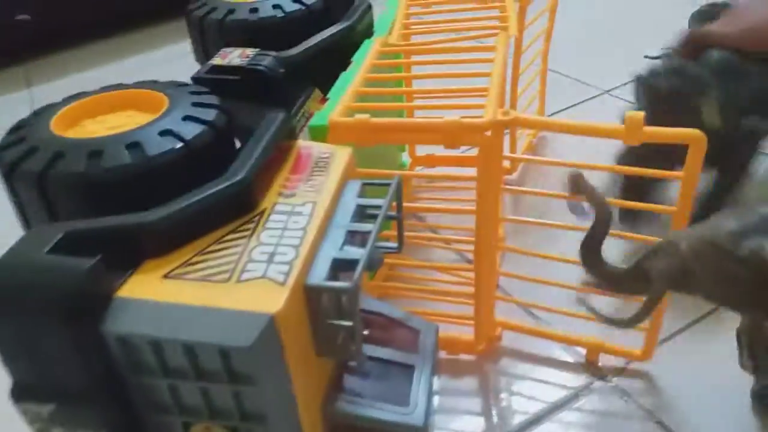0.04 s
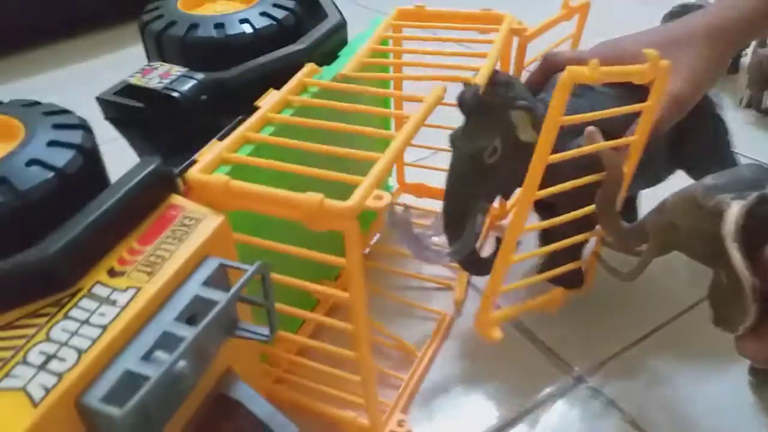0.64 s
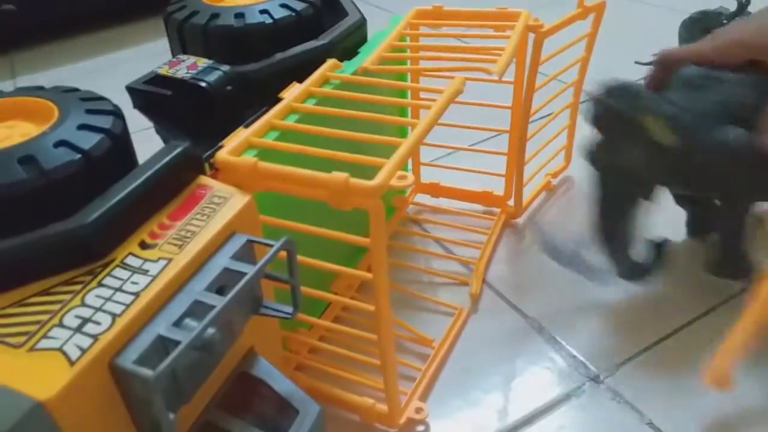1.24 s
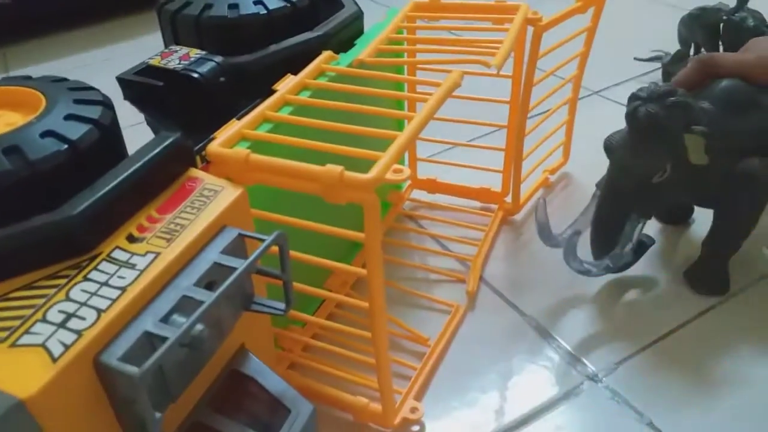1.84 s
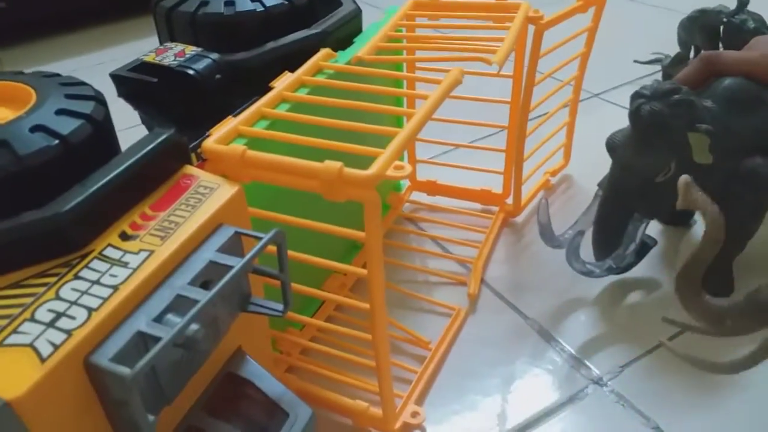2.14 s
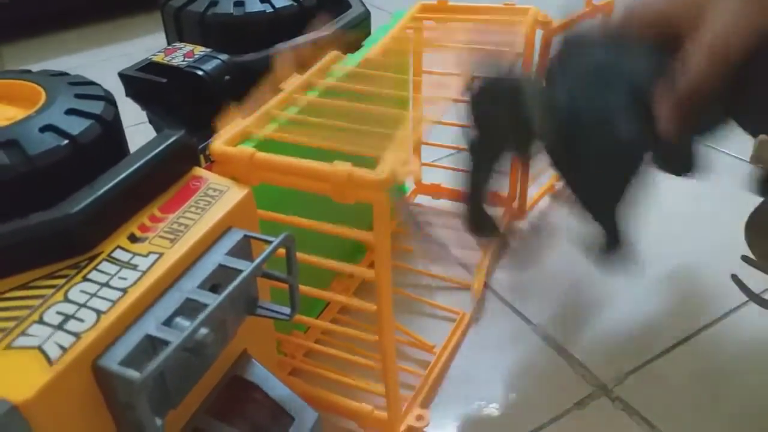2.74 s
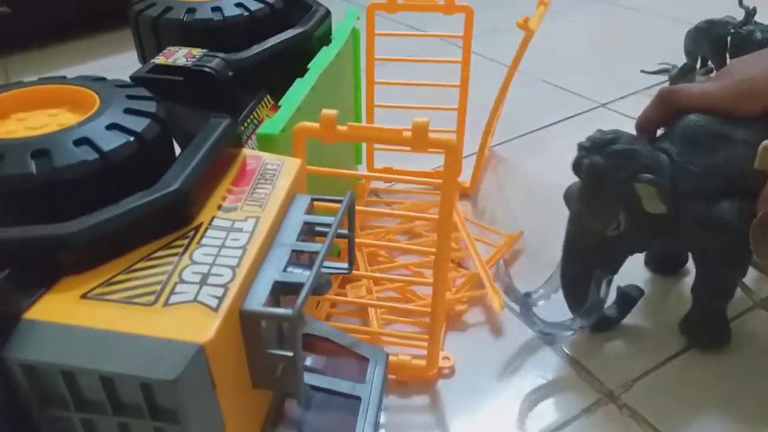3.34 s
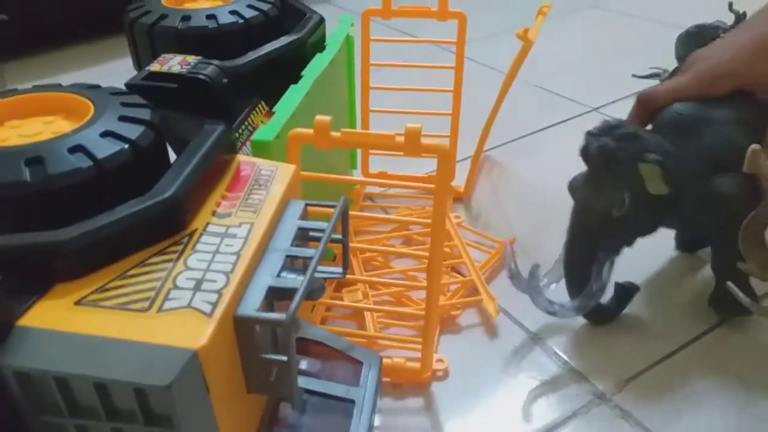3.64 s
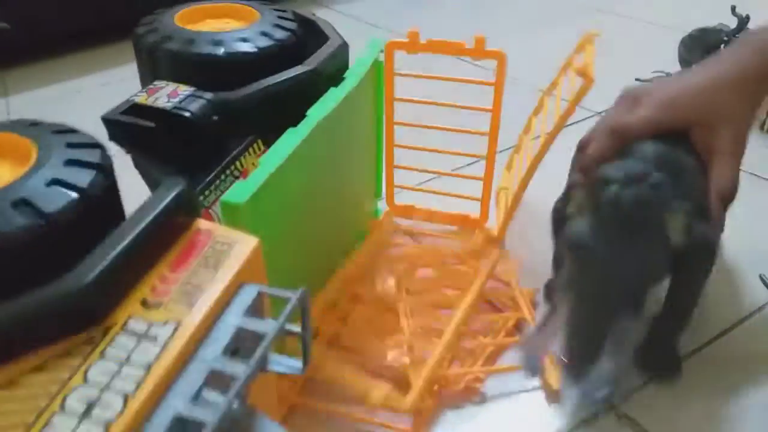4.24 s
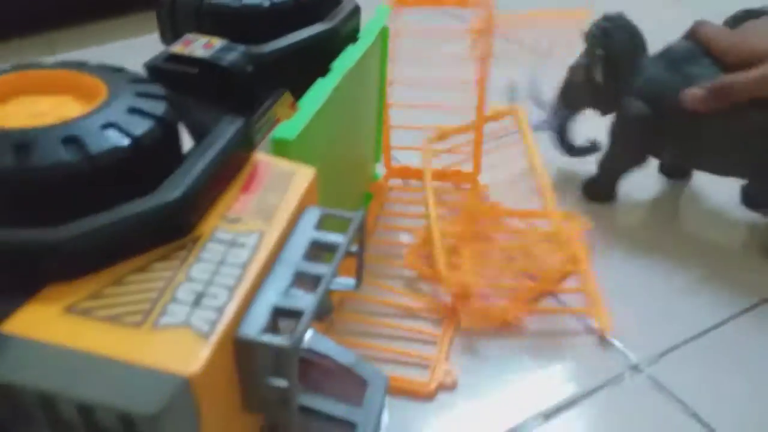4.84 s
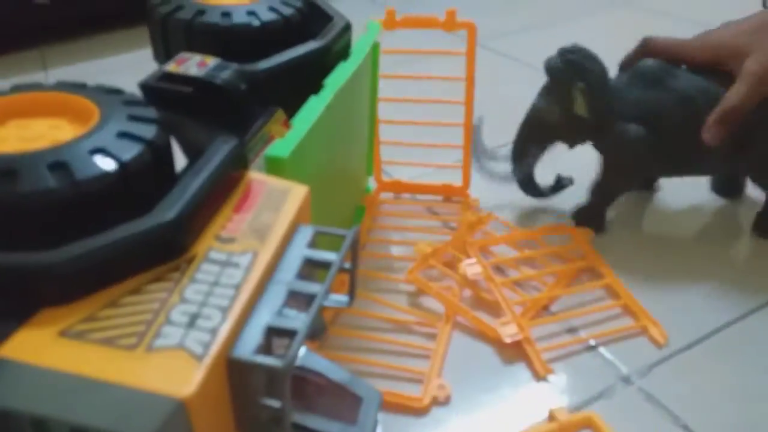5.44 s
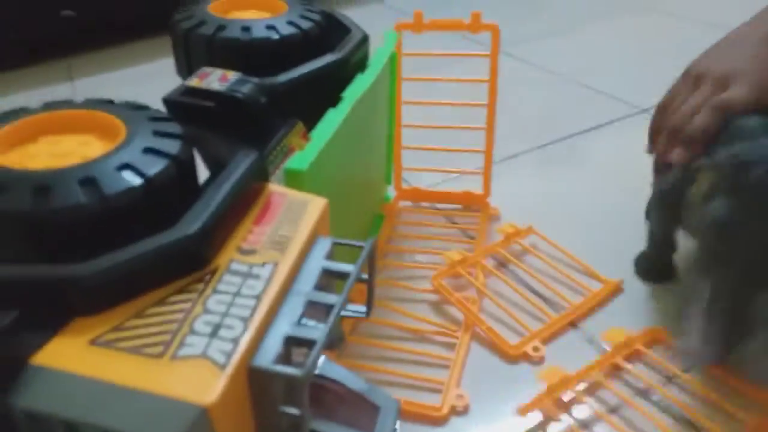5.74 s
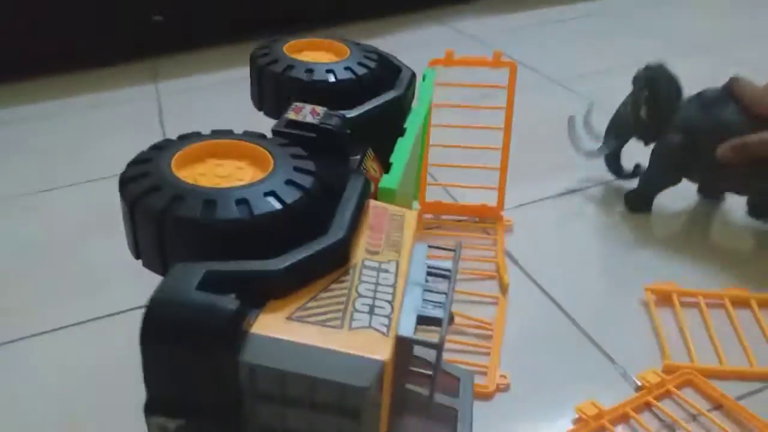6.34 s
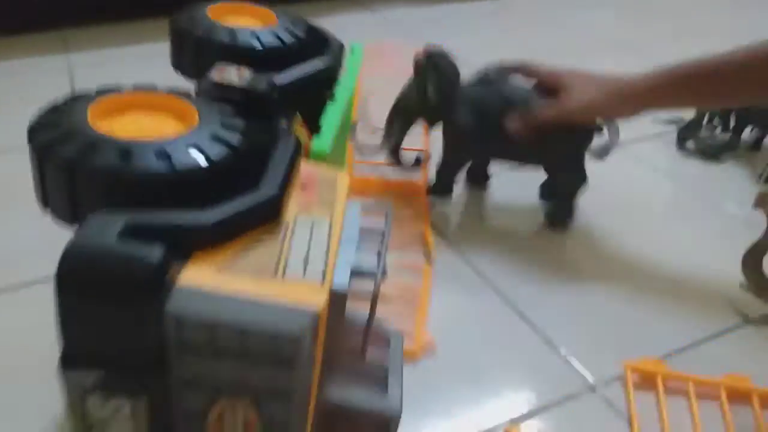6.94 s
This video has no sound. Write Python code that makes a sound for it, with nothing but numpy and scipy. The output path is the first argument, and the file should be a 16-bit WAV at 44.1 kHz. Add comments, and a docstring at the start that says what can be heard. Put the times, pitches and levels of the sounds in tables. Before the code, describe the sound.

A toy elephant is butted against a plastic truck and its cage, making a burst of hollow knocks and rattles. Soft taps, scuffs and dry clicks follow on the floor tiles. More bumps shake the truck, and light fence panels clack down brightly and chatter to rest several times. The toys sound close, in a small, hard room with a short ring and a faint dull hush.

```python
"""Hollow plastic knocks and rattles, bright clacks, and soft taps and scuffs in a small, hard room.
A toy elephant is walked over floor tiles and butted against a plastic truck and its cage of fence panels.
The truck's shell knocks and its loose parts shake; the light panels clack down and chatter to rest;
the figure's feet tap and drag. Each hit is a click and a dying buzz, coloured by the toy's resonances.
The room rings behind them, over a dull hush and a low drone."""
import sys
import numpy as np
from scipy import signal
from scipy.fft import rfft, irfft
from scipy.io import wavfile

SR = 44100
rng = np.random.default_rng(int(sys.argv[2]) if len(sys.argv) > 2 else 0)


def master(y):
    """Save y as 16-bit WAV."""
    cut = np.clip(np.atleast_2d(y).T, -1, 1)
    pcm = np.round(cut * 32767)  # scale
    wavfile.write(sys.argv[1], SR, pcm.astype(np.int16))


N = 312228
HIT_SAMPLES = 8192

# dull tone of the toy figure: (frequency [Hz], gain [dB])
FIGURE_TONE = [(60, -39), (150, 1.5), (350, -0.5), (1000, 0), (1700, -3), (2800, -8), (4000, -14),
               (8000, -32), (15500, -35)]
# tone of plastic rubbing on tile: (frequency [Hz], gain [dB])
SCUFF_TONE = [(100, -24), (250, -5), (700, 0.5), (1300, -6.5), (2400, -3), (4000, -0.5), (7500, -5),
              (9200, -9), (15500, 9)]


def from_db(db):
    """Turn decibels into a gain."""
    return 10 ** (np.asarray(db) / 20)


def rms_one(x):
    """Scale a signal to an average (rms) level of 1."""
    return x / np.sqrt(np.mean(x ** 2) + 1e-20)


def bins(size):
    """Frequencies in the spectrum of a signal this long."""
    return np.maximum(np.fft.rfftfreq(size, 1 / SR), 1)


def at_hz(points, hz):
    """Read a table along a log-frequency axis."""
    known_hz, value = np.transpose(points)
    return np.interp(np.log(hz), np.log(known_hz), value)


def peak(hz, centre, width, db):
    """Boost in dB from one resonance, a pitch at which an object likes to ring."""
    return db / (1 + (2 * (hz - centre) / width) ** 2)


def colour(tone, resonances, size):
    """An object's gain at each frequency: a broad curve with resonances standing out of it."""
    hz = bins(size)
    return from_db(at_hz(tone, hz) + sum(peak(hz, *resonance) for resonance in resonances))


def bands(hz):
    """Share each frequency softly among a low, a middle and a high band."""
    # where the bands meet: (low to middle [Hz], middle to high [Hz])
    edges = [2800, 8700]
    low, below_high = [1 / (1 + (hz / edge) ** 12) for edge in edges]
    return np.array([low, below_high - low, 1 - below_high]).clip(0)


def tilted(db, tilt_db, mid_db):
    """Low, middle and high levels: a harder contact has more tilt, so each higher band gets more."""
    return db, db + tilt_db + mid_db, db + 2 * tilt_db


def causal(gain):
    """Make a minimum-phase filter, so nothing sounds before the contact."""
    cepstrum = irfft(np.log(gain + 1e-9))
    half = len(cepstrum) // 2
    cepstrum[1:half] *= 2
    cepstrum[half + 1:] = 0
    return np.exp(rfft(cepstrum))


def narrow_noise(centre_hz, width_hz):
    """Noise kept to one narrow range of frequencies."""
    gain = 1 / (1 + (2 * (bins(N) - centre_hz) / width_hz) ** 4)
    return rms_one(irfft(rfft(rng.standard_normal(N)) * gain, N))


def hops(hz, count, gap_s, loss_db):
    """A filter that adds weaker repeats at uneven gaps, as a light part bounces."""
    delays = np.cumsum(gap_s * rng.uniform(.5, 2, count)).clip(0, .1)
    sizes = from_db(loss_db - 2 * np.arange(count) + rng.normal(0, 3, count))
    signs = rng.choice([-1, 1], count)
    return 1 + (sizes * signs) @ np.exp(-2j * np.pi * np.outer(delays, hz))


def hits(rows, gain, click, rough_db, swell_s, spot_width, hop_db):
    """Each hit is a click and a dying buzz of tiny contacts. Returns direct sound and the room's share."""
    direct, to_room = np.zeros((2, N + HIT_SAMPLES))
    t, hz = np.arange(HIT_SAMPLES) / SR, bins(HIT_SAMPLES)
    shares = bands(hz)
    # t60 is the time in seconds to fade by 60 dB
    for start, low_db, mid_db, high_db, t60, spot_hz, spot_db, room_db in rows:
        buzz, roughness = rng.standard_normal((2, HIT_SAMPLES))
        flicker_db = rough_db * np.repeat(roughness, 32)[:HIT_SAMPLES]
        force = buzz * from_db(flicker_db - 60 * t / max(t60, .003))
        force *= 1 - np.exp(-t / swell_s)
        force /= np.linalg.norm(force)
        force[0] += click
        bouncing = rfft(force) * hops(hz, count=3, gap_s=.009, loss_db=hop_db)
        at = max(round(start * SR), 0)
        # the spot that is hit favours one pitch; the room gathers all directions and gets a plainer hit
        paths = (direct, bouncing, spot_db, 0), (to_room, 1, spot_db / 2, room_db)
        for path, push, boost_db, path_db in paths:
            struck = gain * from_db(peak(hz, spot_hz, spot_width * spot_hz, boost_db))
            # bring each band to its level, counting its energy as if spread over 10 ms
            power = shares @ np.abs(push * struck) ** 2 * 2 / HIT_SAMPLES / (SR / 100)
            weight = np.sqrt(from_db([low_db, mid_db, high_db]) ** 2 / power @ shares)
            path[at:at + HIT_SAMPLES] += from_db(path_db) * irfft(push * causal(struck * weight))
    return np.array([direct[:N], to_room[:N]])


def grains(strokes, gain, per_s, spread_db, grain_t60, attack_s, release_t60, mid_db):
    """Tiny random contacts make bursts of noise; each stroke of the hand fades them in and out."""
    t = np.arange(N) / SR
    contacts = (rng.random(N) < per_s / SR) * from_db(spread_db * np.minimum(rng.exponential(1, N), 3))
    energy = signal.lfilter([1], [1, -from_db(-120 / (grain_t60 * SR))], contacts ** 2 + 1e-9)
    spectrum = rfft(np.sqrt(energy) * rng.standard_normal(N)) * gain
    powers = np.zeros((3, N))
    for start, length, db, tilt_db in strokes:
        attack = np.clip((t - start) / attack_s + 1, 0, 1)
        release = from_db(-60 * np.clip((t - start - length) / release_t60, 0, 3))
        powers += np.outer(from_db(tilted(db, tilt_db, mid_db)), attack * release) ** 2
    return sum(np.sqrt(power) * rms_one(irfft(spectrum * np.sqrt(share), N))
               for power, share in zip(powers, bands(bins(N))))


def room_hush():
    """Dull background noise, with a wavering drone and a rumble that comes and goes."""
    # tone of the hush: (frequency [Hz], gain [dB])
    tone = [(15, -64), (25, -46), (62, -4.5), (198, -5.5), (227, -3.5), (421, -12), (482, -13), (666, -5.5),
            (919, -9.5), (1490, -13.5), (1660, -15.5), (1950, -15), (2630, -17.5), (2920, -16),
            (15500, -38)]
    # hush and drone swell and sink, as under a recorder's automatic gain control: (time [s], level [dB])
    levels = [(0, -46), (0.9, -53.5), (1.3, -57), (1.9, -50), (2.6, -55.5), (3.6, -51.5), (4.6, -55),
              (5.5, -53.5), (6.5, -58), (7.08, -63)]
    level_db = np.interp(np.arange(N) / SR, *np.transpose(levels))
    hush = rms_one(irfft(rfft(rng.standard_normal(N)) * colour(tone, [], N), N))
    swing_db = level_db - level_db.mean()
    drone_db = level_db.mean() - 9.5 + 0.87 * swing_db   # the drone follows most of that swing
    drone = narrow_noise(centre_hz=198.3, width_hz=8.5) * from_db(drone_db)
    rumble = narrow_noise(80, 60) * from_db(4 * narrow_noise(3, 6))
    return (hush + from_db(-15) * rumble) * from_db(level_db) + drone


def room_echo(x, gap_s, build_s):
    """Echoes off tiles and walls thicken into a tail whose treble dies first; low notes boom a little."""
    # how long the room rings: (frequency [Hz], time to fade by 60 dB [s])
    fade_times = [(150, 0.8), (1000, 0.52), (4000, 0.54), (8000, 0.5), (15000, 0.25)]
    # strength of the tail: (frequency [Hz], gain [dB])
    tone = [(150, -12.5), (1000, -7), (4000, -10.5), (8000, -10.5), (15000, -10)]
    # standing waves between the walls: (frequency [Hz], width [Hz], boost [dB])
    booms = [(163.6, 31, 8.5), (219, 25, 5), (323, 29, 5.5)]
    t, hz = np.arange(SR) / SR, bins(SR)
    noise, tail = rfft(rng.standard_normal(SR)), 0
    centres = np.geomspace(100, 16000, 12)
    onset = 1 - np.exp(-np.maximum(t - gap_s, 0) / build_s)
    for centre, pick in zip(centres, np.eye(len(centres))):
        decay = onset * from_db(-60 * t / at_hz(fade_times, centre))
        band = irfft(noise * np.interp(np.log(hz), np.log(centres), pick), SR)
        tail = tail + band * decay / np.linalg.norm(decay)
    tail = irfft(rfft(tail) * causal(colour(tone, booms, SR)))
    return signal.fftconvolve(x, tail)[:N]


def drifting_echo(x, places):
    """The listening point moves, so one pattern of echoes blends into the next."""
    place = np.linspace(0, places - 1, N)
    fades = (np.sqrt(np.maximum(1 - abs(place - k), 0)) for k in range(places))
    return sum(room_echo(x * fade, gap_s=0.0022, build_s=0.0031) for fade in fades)


def scuffs():
    """Plastic grips and slips as the toys are dragged over the tiles."""
    # each drag: (start [s], length [s], low level [dB], tilt per band [dB])
    slides = [(0.0, 0.24, -56, -12), (0.15, 0.14, -43.5, -10), (1.57, 0.064, -46.5, -11),
              (1.65, 0.11, -54.5, -3), (2.68, 0.06, -55, -10), (3.85, 0.04, -52, -11),
              (3.96, 0.24, -49, -8), (5.52, 0.494, -52.5, -8), (6.52, 0.11, -57.5, -7.5),
              (6.66, 0.21, -58, -2)]
    return grains(slides, colour(SCUFF_TONE, [], N), per_s=320, spread_db=3.0, grain_t60=0.027,
                  attack_s=0.0099, release_t60=0.1, mid_db=6.0)


def scrapes(brush_count, t60, spot_db, room_db):
    """Toys catch on the tiles with short, hollow scrapes; fingers add faint brushes at random."""
    # each catch: (time [s], low level [dB], favoured pitch [Hz])
    catches = [(0.1545, -40, 2600), (0.181, -42, 3750), (0.7703, -50, 2560), (1.06, -55, 2940),
               (1.5551, -37, 2000), (1.719, -55, 3860), (1.785, -48, 4200), (2.455, -48.5, 2000),
               (2.496, -40.5, 3900), (2.595, -49, 2400), (2.676, -41, 2150), (2.731, -57, 2400),
               (3.7896, -44, 2440), (3.8393, -37.5, 3480), (3.8818, -41.5, 2500), (4.101, -33.5, 3630),
               (5.4701, -40.5, 4240), (5.559, -44, 1510), (5.788, -37.5, 1960), (6.93, -47.5, 1970)]
    brushes = [(when * N / SR, -62 + 5 * size, 1400 * 3 ** pitch)
               for when, size, pitch in rng.random((brush_count, 3))]
    rows = [(start, db, db - 0.5, db - 16, t60, hz, spot_db, room_db)
            for start, db, hz in catches + brushes]
    return hits(rows, colour(SCUFF_TONE, [], HIT_SAMPLES),
                click=0.25, rough_db=3.5, swell_s=0.00091, spot_width=0.16, hop_db=-12)


def footsteps(leg_hz, leg_db, room_db):
    """The figure's softer feet give one dull push on the tiles, with hardly any ring."""
    # each step: (time [s], low level [dB], middle level [dB], time to fade by 60 dB [s])
    steps = [(1.7376, -29, -42, 0.003), (1.7427, -40, -44, 0.017), (1.81, -37.5, -45, 0.03),
             (1.8607, -34.5, -50, 0.032), (2.039, -38.5, -71, 0.015), (2.048, -32, -40, 0.02),
             (2.147, -31.5, -44, 0.057), (3.682, -45.5, -51, 0.03)]
    rows = [(start, low_db, mid_db, mid_db - 19, t60, leg_hz, leg_db, room_db)
            for start, low_db, mid_db, t60 in steps]
    return hits(rows, colour(FIGURE_TONE, [], HIT_SAMPLES),
                click=1.55, rough_db=2.0, swell_s=0.00011, spot_width=0.2, hop_db=-23)


def figure_bumps(cavity_db, room_db):
    """The hollow figure bumps into things; one strong resonance gives a round, pitched knock."""
    # each bump: (time [s], low level [dB], time to fade by 60 dB [s], pitch [Hz])
    bumps = [(2.593, -40.5, 0.08, 520), (4.137, -25.5, 0.076, 690), (4.194, -31.5, 0.056, 724),
             (5.122, -35, 0.036, 686), (6.985, -32, 0.05, 760)]
    rows = [(start, db, db - 24, db - 41, t60, hz, cavity_db, room_db) for start, db, t60, hz in bumps]
    return hits(rows, colour(FIGURE_TONE, [], HIT_SAMPLES),
                click=0.7, rough_db=-1.0, swell_s=0.0011, spot_width=0.4, hop_db=-23)


def panel_chatter(ticks_per_s, spread_db, low_db, high_db, pitch_hz):
    """A rocking panel ticks at uneven gaps until it rests. Returns more rows of clacks."""
    # each spell of rocking: (start [s], length [s], level at start [dB], level at end [dB])
    spells = [(0.879, 0.23, -67, -66), (3.121, 0.066, -37, -38), (3.231, 0.25, -42, -55),
              (4.341, 0.43, -46, -64.5), (4.946, 0.14, -45, -38), (5.069, 0.29, -39.5, -37),
              (5.64, 0.29, -41, -45.5), (6.294, 0.1, -37, -45), (6.704, 0.16, -55, -52.5)]
    rows = []
    for start, length, first_db, last_db in spells:
        gaps, sizes = rng.uniform(.5, 1.5, 40), rng.standard_normal(40)
        for after, size in zip((np.cumsum(gaps) - gaps[0]) / ticks_per_s, sizes):
            if after < length:
                db = first_db + (last_db - first_db) * after / length + spread_db * size
                rows.append((start + after, db, low_db, high_db, pitch_hz))
    return rows


def fence_panels():
    """Light, stiff panels click dryly on the tiles, clack brightly on each other and hop."""
    # bright tone of a panel: (frequency [Hz], gain [dB])
    tone = [(100, -16), (300, -12), (700, -16.5), (1500, -7.5), (2500, -10.5), (3500, -2.5), (5500, 4.5),
            (8200, 1), (9100, -1.5), (10800, 3.5), (15500, -2)]
    # where a panel rings: (frequency [Hz], width [Hz], boost [dB])
    resonances = [(3450, 530, 6.5), (4320, 250, 2.5), (4800, 210, 0), (6030, 400, 0), (6900, 680, 2.5),
                  (7940, 320, 4.5)]
    # bars on tile, close by: (time [s], middle level [dB], high against middle [dB], favoured pitch [Hz])
    clicks = [(0.3776, -21, -11, 5840), (2.0613, -24.5, -3, 6250), (2.0754, -19, -2, 6230),
              (2.119, -34.5, -2, 5660), (2.184, -31.5, -23, 4250), (2.2197, -20.5, -21, 5650),
              (2.2308, -36, -24, 5210), (2.238, -41, -18, 5020), (2.2472, -24.5, -1, 5600),
              (2.258, -18.5, -5, 8300), (2.3289, -23, -6.5, 5130), (2.3328, -30, -20, 5700),
              (2.3722, -34, -15, 4500), (2.383, -39, -3, 6390), (2.4086, -44, -13, 4930),
              (3.0335, -20, -18, 4000), (4.215, -19.5, -21, 3470), (6.4067, -32, -35, 5700)]
    # panel on panel, further off:
    # (time [s], middle level [dB], low against middle [dB], high against middle [dB], favoured pitch [Hz])
    clacks = [(1.0105, -59.5, 4, 1, 2500), (1.4742, -43, -2.5, 3.5, 6000), (1.6166, -35, -2.5, -13, 3930),
              (1.666, -48, 3.5, 16, 8000), (1.8036, -41, -12, 1, 6160), (1.9756, -51.5, -12, -10, 4930),
              (3.206, -34.5, -15, -0.5, 6840), (3.368, -50, -14, 4, 6460), (3.3884, -55, 0, 7, 6960),
              (4.025, -41, -9, -3, 3500), (4.1208, -16.5, -8.5, -5, 6300), (4.2939, -25.5, -8, 1, 6510),
              (4.3155, -41, 2, 7, 6750), (4.4253, -53, 6.5, 14, 6600), (4.4415, -43, -5, -1, 6760),
              (4.4905, -43.5, -7.5, -8, 7130), (4.529, -47, -4.5, 0, 7010), (4.9198, -33.5, -17, 8, 3800),
              (4.9295, -23.5, -7, 1.5, 7450), (5.0851, -27, -9.5, 2, 7900), (5.0939, -30, -16, 3.5, 7900),
              (5.1463, -34, -12.5, -1, 7800), (5.2024, -32.5, -25, 0, 7760), (5.226, -49, -28, 9, 7300),
              (5.2438, -31, -24, 3.5, 7830), (5.25, -37, -31, 4, 7900), (5.2933, -27.5, -30, 0.5, 7200),
              (5.345, -32, -39, 1, 6940), (5.6124, -43.5, 3.5, 5.5, 6500), (5.6424, -40.5, -9, -6, 7550),
              (5.6844, -32.5, -15, -4, 7450), (5.708, -40, -20, 1, 6390), (5.7673, -32.5, -5.5, 0, 7010),
              (5.805, -43, -10, 5, 7270), (5.829, -47, -20, -4, 7550), (5.8535, -46, -29.5, 5, 8280),
              (5.88, -42.5, -31, 4.5, 7270), (6.0979, -18, -13, 2, 6750), (6.2566, -24, -15, 1.5, 7060),
              (6.26, -21.5, -32, -4.5, 7500), (6.277, -27.5, -32, -13, 7300),
              (6.3177, -34.5, -11.5, -5, 7550), (6.6608, -37, -3, -7, 3760), (6.6913, -41, -9, -5, 7500),
              (6.791, -42.5, -7.5, -5, 6940), (6.8308, -39.5, -26, -12, 7700)]
    click_t60, click_spot_db, click_room_db = 0.018, 7.0, -6
    clack_t60, clack_spot_db, clack_room_db = 0.028, 10.5, -1
    ticks = panel_chatter(ticks_per_s=36, spread_db=3, low_db=-22, high_db=-1.5, pitch_hz=7340)
    near = [(start, db - 17, db, db + high_db, click_t60, hz, click_spot_db, click_room_db)
            for start, db, high_db, hz in clicks]
    far = [(start, db + low_db, db, db + high_db, clack_t60, hz, clack_spot_db, clack_room_db)
           for start, db, low_db, high_db, hz in clacks + ticks]
    gain = colour(tone, resonances, HIT_SAMPLES)
    return (hits(near, gain, click=1.0, rough_db=2.0, swell_s=0.00025, spot_width=0.46, hop_db=-15)
            + hits(far, gain, click=0.6, rough_db=4.0, swell_s=0.00011, spot_width=0.25, hop_db=-14.5))


def truck(spot_db, room_db):
    """The hollow shell knocks when it is butted, and its loose parts rattle."""
    # tone of the shell: (frequency [Hz], gain [dB])
    tone = [(60, -26.5), (120, -0.5), (250, -4), (440, -9.5), (700, -2), (1400, -1.5), (2000, -2.5),
            (3200, -3.5), (5000, -4), (8000, -7.5), (9000, -16.5), (12000, -13), (15500, -14.5)]
    # where the shell rings: (frequency [Hz], width [Hz], boost [dB])
    resonances = [(218, 18, 6.5), (302, 39, 7.5), (372, 76, 10), (528, 87, 11), (705, 26, 3), (777, 14, 7),
                  (1019, 76, 2.5), (1203, 210, 1.5), (1480, 90, 2.5), (1743, 58, 3), (2280, 77, 3.5),
                  (2545, 59, 3.5)]
    # blows on the truck and its cage: (time [s], low level [dB], tilt per band [dB], favoured pitch [Hz])
    blows = [(0.2993, -33, 1, 2580), (0.307, -29, 5, 513), (0.318, -21.5, -2, 1580),
             (0.3326, -16.5, -9, 1160), (0.342, -26, -11, 1200), (0.3514, -21, -20, 916),
             (0.366, -28.5, -9, 229), (0.39, -20, -6, 2430), (0.416, -20, -8.5, 1200), (0.466, -33, 3, 366),
             (0.4974, -24, -7, 1280), (0.5307, -25.5, 1, 1450), (0.5493, -16.5, -4, 1105),
             (0.559, -18, -2.5, 1550), (0.5739, -19, -6, 388), (0.608, -28, -5, 420),
             (0.6609, -36.5, -0.5, 730), (2.8131, -38.5, 2, 2320), (2.852, -34, 0, 700),
             (2.872, -31.5, -1, 4170), (2.898, -32, -7, 507), (2.9137, -31, 1.5, 199),
             (2.9455, -28, -4.5, 760), (3.015, -30, 1, 900), (3.0384, -23.5, -0.5, 1800),
             (3.1004, -32.5, -1, 1497), (3.257, -41, 2.5, 1490), (3.274, -42.5, 4.5, 1560),
             (4.058, -28, -2, 465), (4.1348, -20.5, 1, 750), (4.1555, -20.5, -0.5, 2420),
             (4.172, -22.5, -1, 637), (4.188, -28.5, -4.5, 726), (4.7557, -33.5, 5, 3500),
             (4.783, -21, -1.5, 824), (4.831, -36, -1, 1830), (4.8587, -30, -15, 1480),
             (4.8728, -29, -0.5, 3400), (5.9506, -31, 3, 790), (5.989, -27.5, 2, 605),
             (5.9967, -24.5, 2.5, 1600), (6.0203, -25.5, 0, 1510), (6.0437, -23.5, 0.5, 352),
             (6.0656, -30, 3.5, 352), (6.0873, -23, -8, 3120), (6.1319, -30, 2.5, 4430),
             (6.9668, -37, -3, 664), (6.9853, -31, -1, 850)]
    # shoves that shake the loose parts: (start [s], length [s], low level [dB], tilt per band [dB])
    shoves = [(0.31, 0.071, -26, -3.5), (0.44, 0.13, -32, -11), (0.535, 0.062, -30, -5.5),
              (0.61, 0.068, -37.5, -4.5), (2.865, 0.11, -33, -5.5), (3.02, 0.094, -38, -2.5),
              (4.135, 0.074, -27.5, -1), (4.78, 0.15, -38.5, 0), (5.995, 0.14, -32, -1.5),
              (6.99, 0.12, -44.5, -2.5)]
    rows = []
    for start, db, tilt_db, hz in blows:
        t60 = 0.064 * (1200 / hz) ** 0.2   # higher knocks die sooner
        rows.append((start, *tilted(db, tilt_db, mid_db=-1), t60, hz, spot_db, room_db))
    knocks = hits(rows, colour(tone, resonances, HIT_SAMPLES),
                  click=0.047, rough_db=3.0, swell_s=0.00011, spot_width=0.21, hop_db=-13.5)
    rattle = grains(shoves, colour(tone, resonances, N), per_s=150, spread_db=1.5, grain_t60=0.032,
                    attack_s=0.004, release_t60=0.18, mid_db=2.0)
    return from_db(0.87) * knocks + from_db(-2.0) * rattle


def scene():
    """All the toys sound into one room, heard in mono."""
    toys = truck(spot_db=12.5, room_db=0.0) + fence_panels()
    toys += footsteps(leg_hz=780, leg_db=-2.0, room_db=-2.5)
    toys += figure_bumps(cavity_db=19, room_db=-14)
    toys += scuffs() + scrapes(brush_count=60, t60=0.054, spot_db=12, room_db=0.0)
    direct, to_room = toys
    return (direct + drifting_echo(to_room, places=5) + room_hush())[None]


def record(dry):
    """Round off the loudest peaks and cut the highest treble."""
    ceiling, cutoff_hz = 1.3, 15600
    rounded = ceiling * np.tanh(dry / ceiling)
    return signal.sosfilt(signal.ellip(10, .3, 70, cutoff_hz, fs=SR, output="sos"), rounded)


dry = scene()
out = record(dry)
master(out)
```